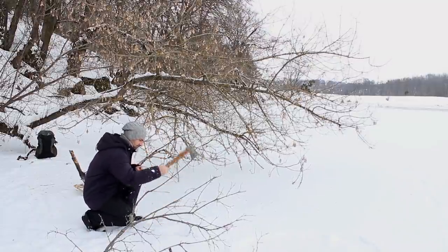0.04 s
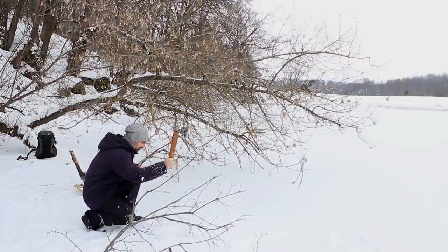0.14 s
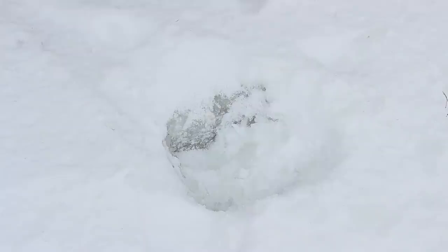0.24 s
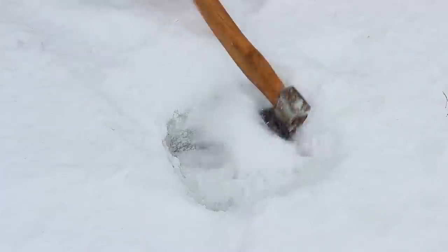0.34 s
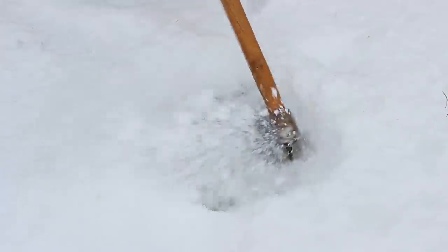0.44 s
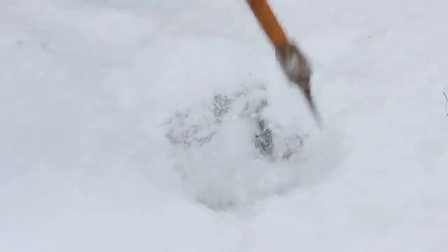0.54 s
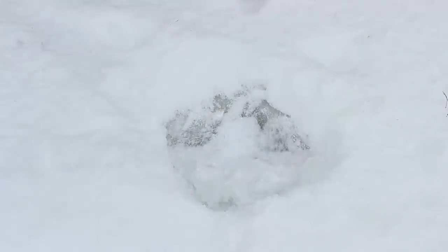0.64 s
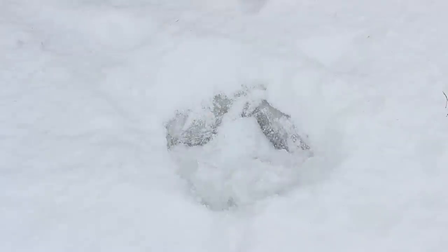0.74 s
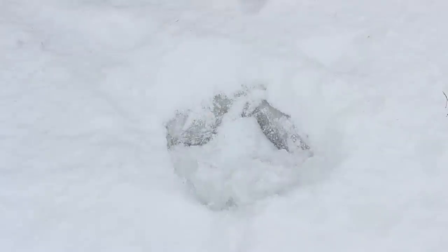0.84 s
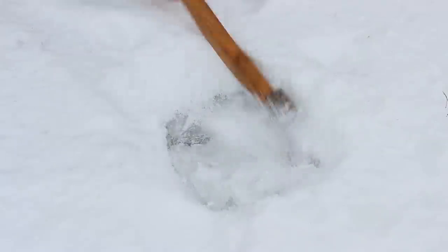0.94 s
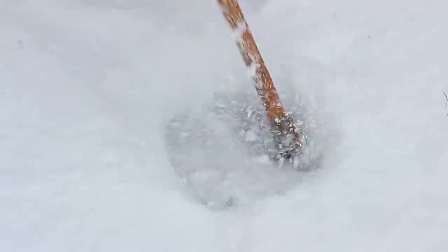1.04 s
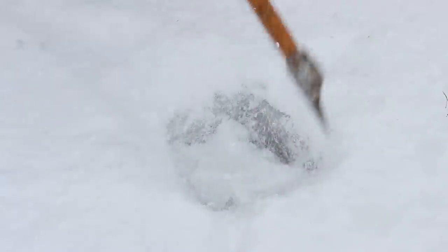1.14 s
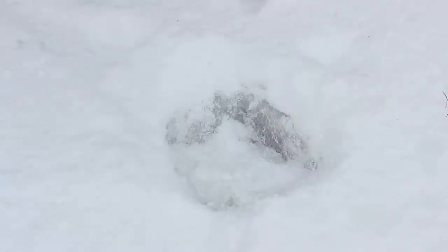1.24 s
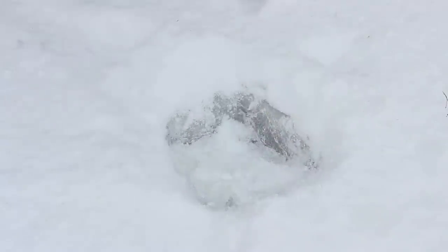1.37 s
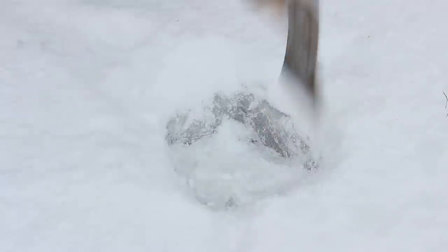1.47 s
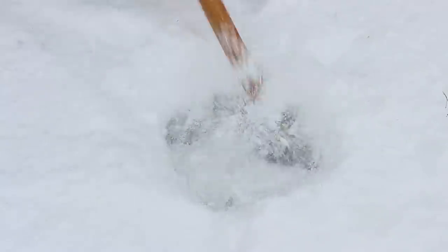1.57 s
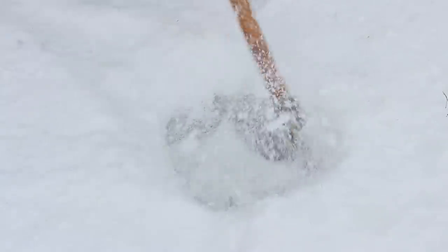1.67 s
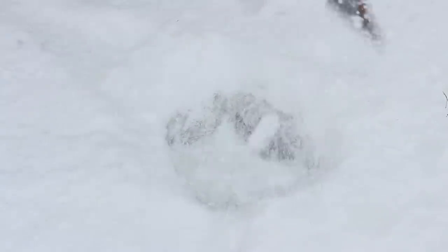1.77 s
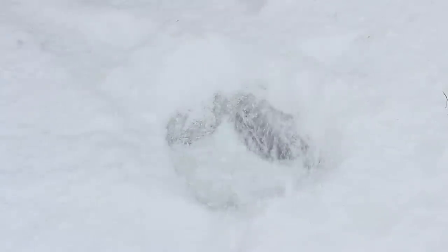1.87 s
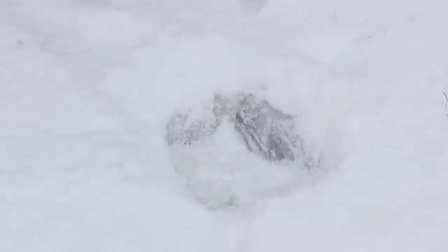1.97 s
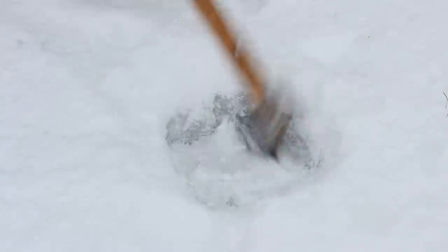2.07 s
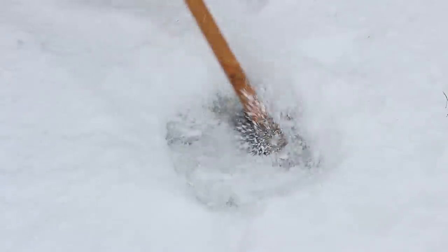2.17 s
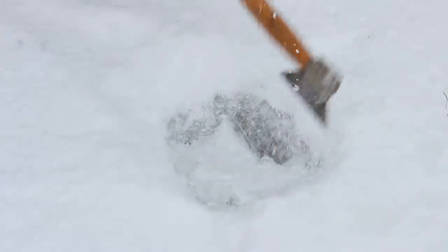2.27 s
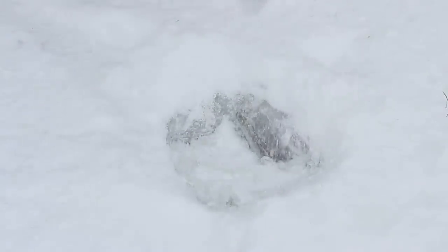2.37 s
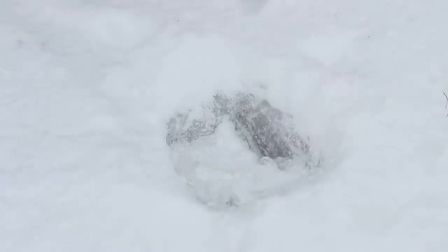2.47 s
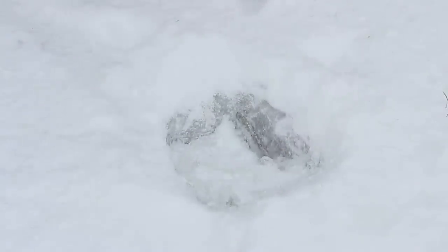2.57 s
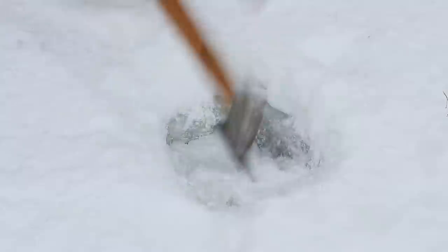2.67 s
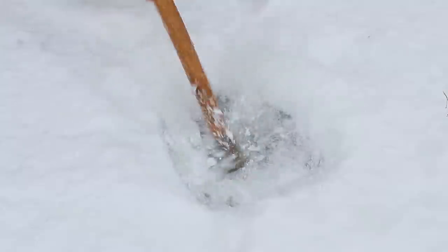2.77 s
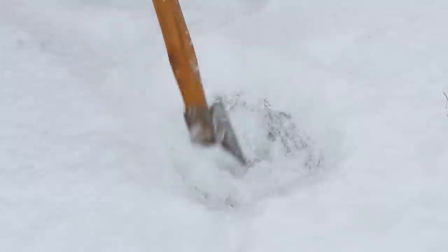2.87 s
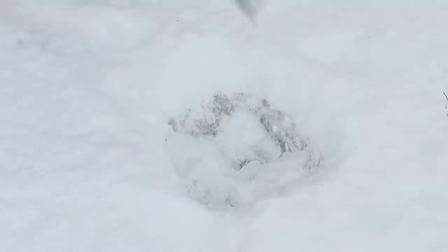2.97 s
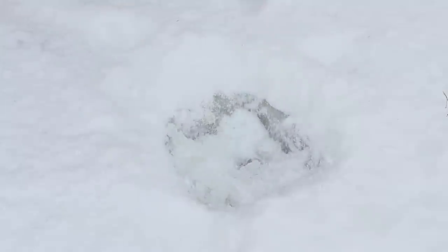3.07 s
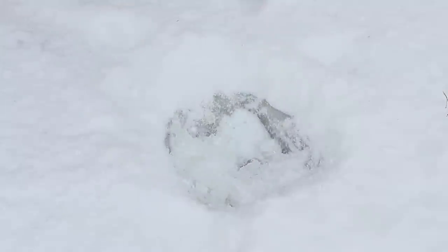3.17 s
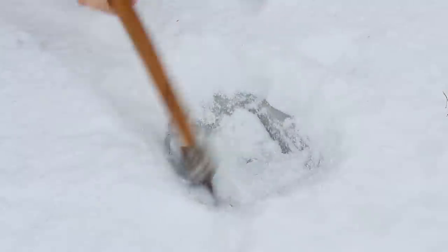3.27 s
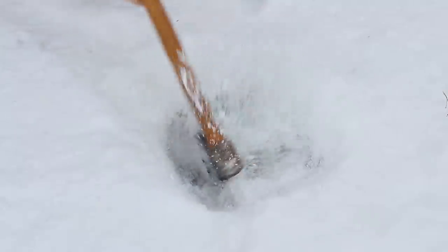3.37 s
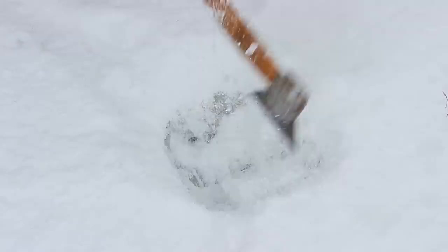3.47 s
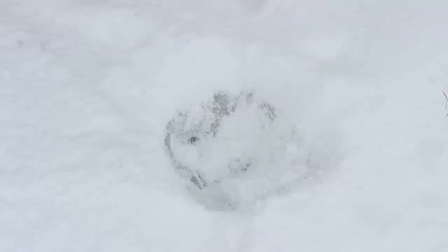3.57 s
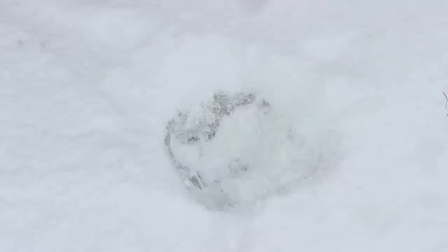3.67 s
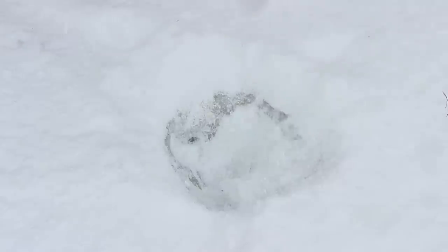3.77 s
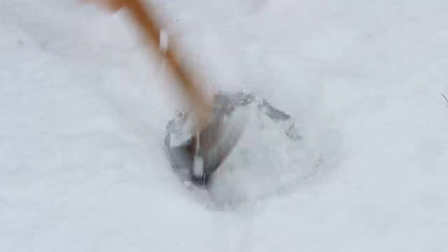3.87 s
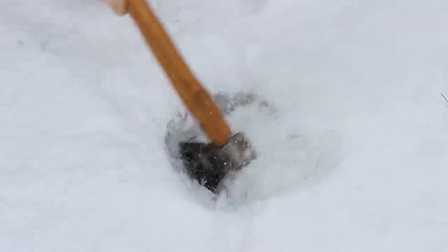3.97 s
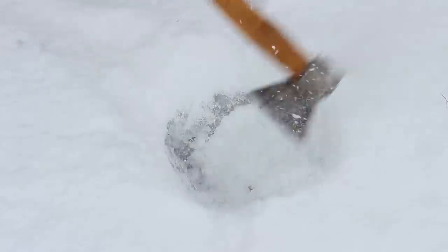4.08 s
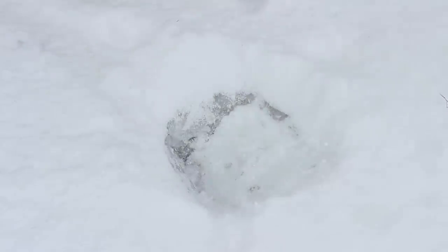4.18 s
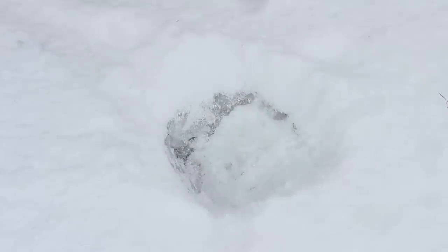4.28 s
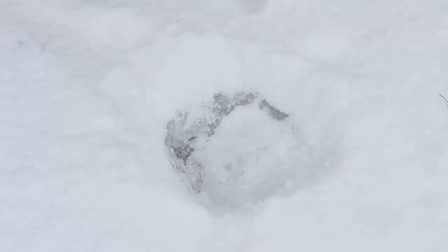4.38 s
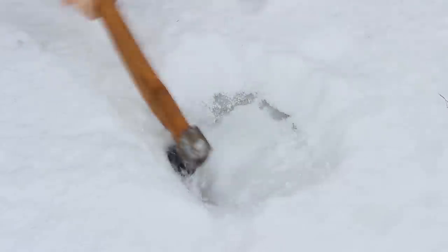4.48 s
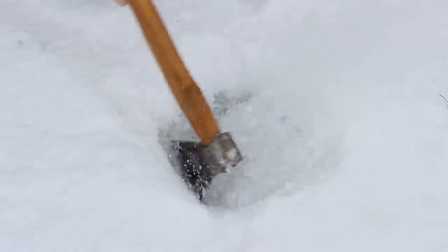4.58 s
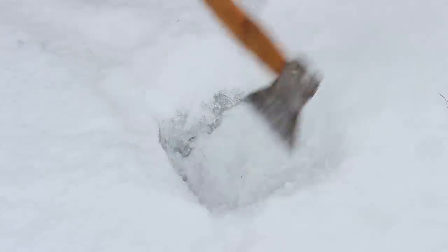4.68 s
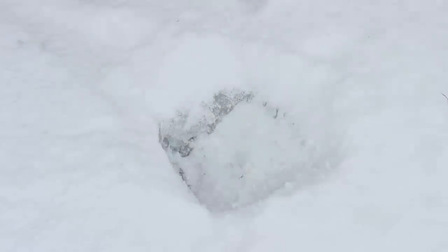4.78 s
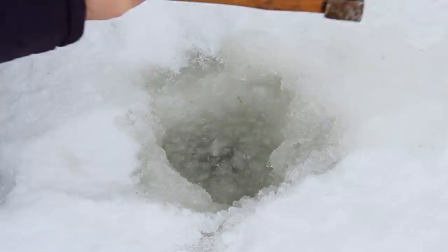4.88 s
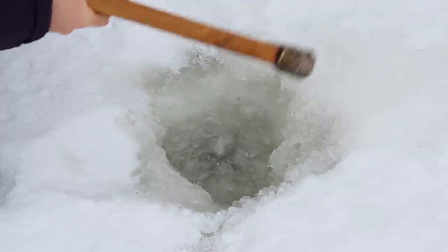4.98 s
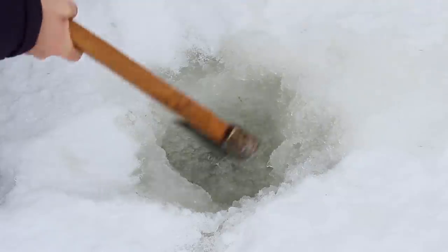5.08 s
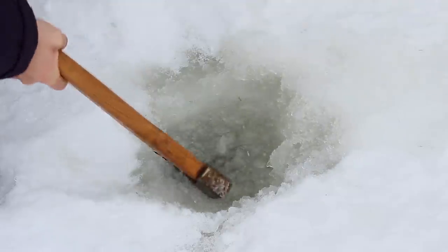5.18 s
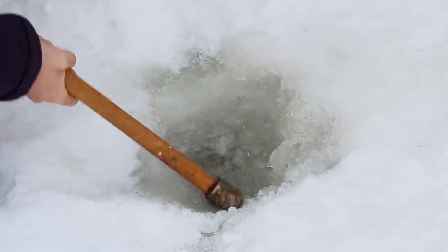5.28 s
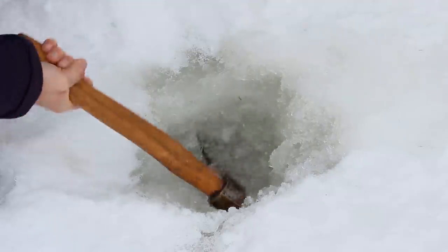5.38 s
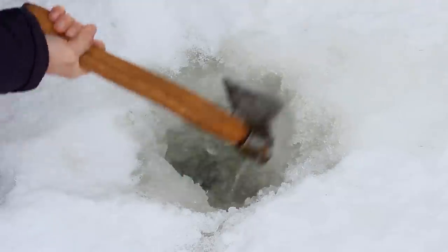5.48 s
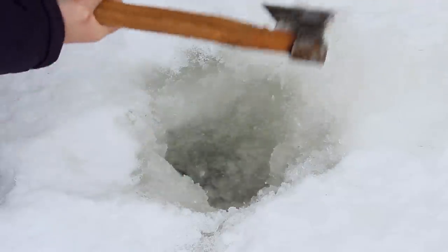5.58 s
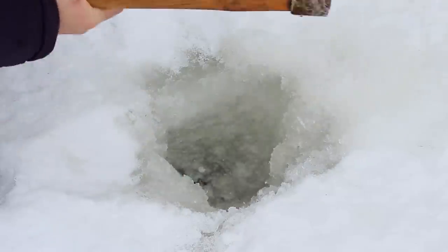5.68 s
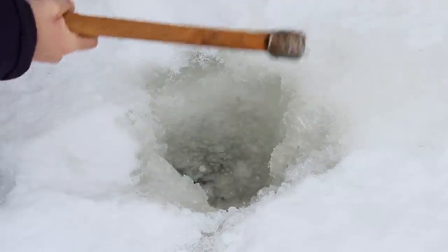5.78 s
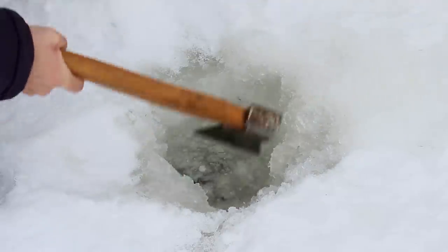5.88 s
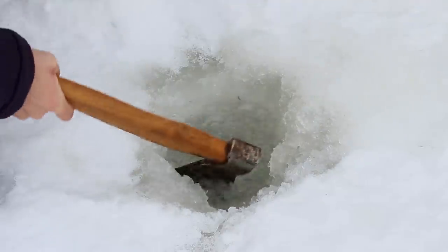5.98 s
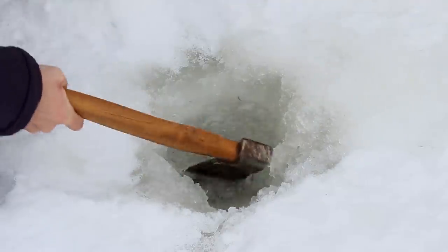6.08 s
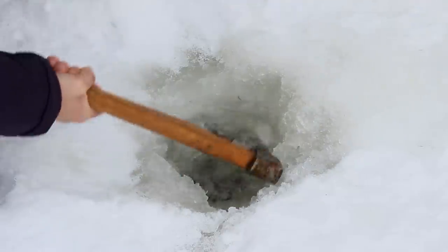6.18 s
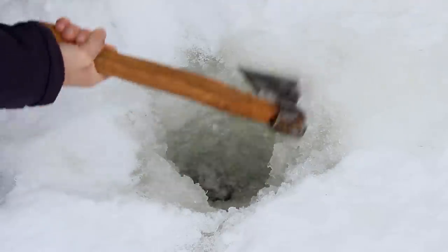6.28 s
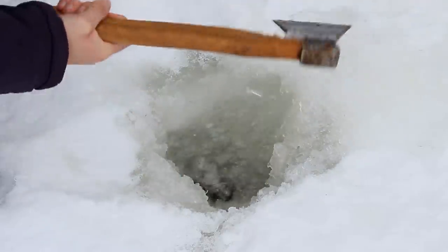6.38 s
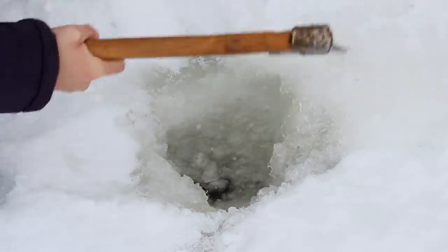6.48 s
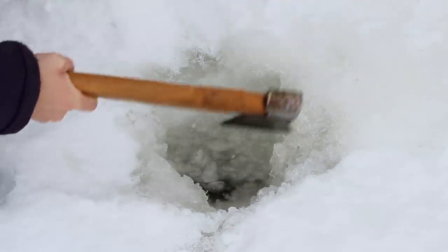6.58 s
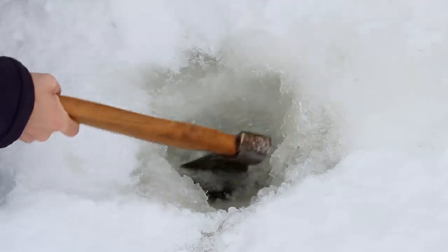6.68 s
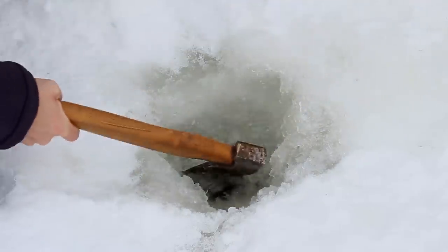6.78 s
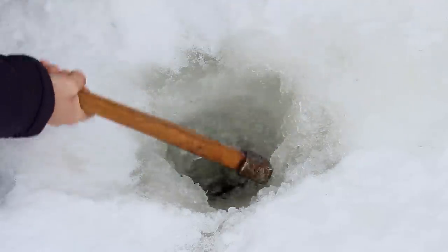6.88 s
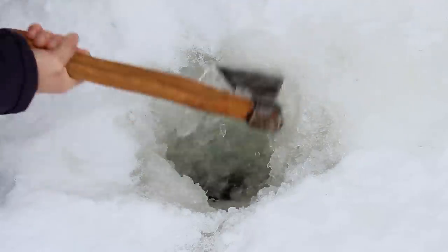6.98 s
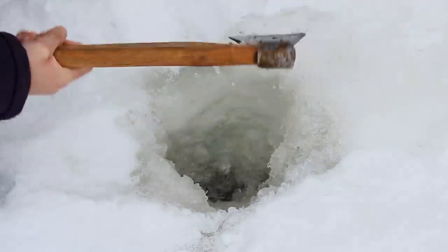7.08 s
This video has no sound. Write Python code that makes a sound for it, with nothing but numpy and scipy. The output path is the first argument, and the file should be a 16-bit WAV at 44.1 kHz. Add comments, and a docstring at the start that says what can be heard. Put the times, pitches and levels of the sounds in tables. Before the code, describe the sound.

A hatchet chops eight times into hard ice, ringing faintly between blows, then stirs wet, crunching, bubbling slush.

```python
"""A hatchet chops eight times into hard ice, then stirs wet slush in the hole, outdoors over snow.
Each chop is a short crushing burst that overloads the one close microphone; the steel head rings as it
is pulled free and chips patter down. In the slush grains crunch, bubbles pop and the wet steel rings
lower. Loose snow shifts throughout, over a faint low wind at the microphone."""
import sys
import numpy as np
from scipy import signal
from scipy.fft import rfft, irfft
from scipy.io import wavfile
from scipy.ndimage import uniform_filter1d

SR = 44100
rng = np.random.default_rng(int(sys.argv[2]) if len(sys.argv) > 2 else 0)


def wav_record(signal):
    """Record a signal, one row per channel, as 16-bit PCM in the file named by sys.argv[1]."""
    frames = np.transpose(np.atleast_2d(signal))
    bounded = np.clip(frames, -1, 1)
    # unit amplitude maps onto the largest positive 16-bit level
    quanta = np.round(bounded * 32767).astype(np.int16)
    wavfile.write(sys.argv[1], SR, quanta)


N = 314433

# spectrum of cracking ice: f/Hz, level/dB
CRACK_SPECTRUM = [(88, -88), (150, -27), (723, 10), (4690, 9), (5480, 11), (7660, -4.5), (11400, -1.5),
                  (15300, -9), (16500, -38)]
# resonances of the ice sheet and the handle: f/Hz, width/Hz, level/dB
SHEET_MODES = [(530, 93, 3), (1120, 130, -1), (2280, 390, 4), (2886, 460, 4)]
# blows, close to the microphone: t/s, crack/dB, wedging time/s, thud/dB, second split delay/s,
# second split/dB, thud t60/s, knock/Hz, knock/dB
CHOPS = [(0.4491, -13.5, 0.0056, -18, 0.0022, -44, 0.041, 480, -23),
         (1.042, -13.5, 0.016, -21.5, 0.0098, -12, 0.032, 2110, -21),
         (1.627, -9, 0.0077, -19.5, 0.0057, -7.5, 0.0065, 1036, -10),
         (2.209, -11.5, 0.013, -17, 0.0086, -14, 0.017, 1140, -14.5),
         (2.81, -10, 0.011, -21.5, 0.0059, -15.5, 0.026, 2700, -34),
         (3.404, -14.5, 0.014, -17.5, 0.0029, -19.5, 0.015, 510, -26.5),
         (4.008, -13.5, 0.012, -18, 0.0061, -15, 0.022, 1130, -15.5),
         (4.596, -9.5, 0.0064, -14, 0.0047, -23, 0.013, 660, -15.5)]
def chop(crack_db, wedge_s, thud_db, delay, split_db, t60, knock_hz, knock_db):
    """The edge cracks the ice twice; the sheet thuds and knocks as the blade wedges in, then all dies."""
    t = np.arange(4096) / SR
    crack_noise, sheet_noise, knock_noise = rng.standard_normal((3, len(t)))
    since_stop = np.maximum(t - wedge_s, 0)
    splits = amp(crack_db - 2150 * t) + amp(split_db - 2100 * (t - delay)) * (t > delay)
    crack = coloured(crack_noise, CRACK_SPECTRUM) * splits * amp(-60 * since_stop / (0.073 * t60))
    sheet = unit_rms(sum(amp(db) * resonate(sheet_noise, hz, width) for hz, width, db in SHEET_MODES))
    knock = amp(knock_db) * resonate(knock_noise, knock_hz, 240) * ramp((t - delay) / 0.0012)
    thud = (amp(thud_db) * sheet * ramp(0.3 + t / wedge_s) + knock) * amp(-60 * since_stop / t60)
    crumbs = amp(-53.5 - 60 * t) * coloured(crack_noise[::-1], CRUNCH_SPECTRUM)  # broken ice settles
    blow = (crack + thud + crumbs) * ramp(t / .0003)
    return highpass(blow, hz=230, order=3)  # the blow carries no deep bass


# blows that jam: t/s, peak/dB
JOLTS = [(1.0595, -22.5), (3.418, -22), (4.0142, -13.5)]
def jolt(db):
    """The blade jams to a stop in the ice: one short low push of pressure."""
    return -amp(db) * np.hanning(round(0.00087 * SR))


# modes of the steel head: f/Hz, relative level/dB, t60/s
STEEL_MODES = [(2080, 0, .9), (3914, 2, .2), (3973, 0, 1.8), (5520, 3, .18), (7130, -2, .18),
               (10800, -3, .1), (11400, -2, .25)]
# the head comes free: t/s, drive at 4 kHz/dB, at 5.5 kHz/dB, of the upper modes/dB, of the low mode/dB,
# time until damped/s, scrape/dB
STEEL_RINGS = [(.005, -53, -45.5, -51.5, -44, 0.3, -46), (0.538, -47, -44, -52, -34, 0.042, -44),
               (0.567, -56, -54, -45.5, -43.5, 0.3, -39), (1.148, -40, -52, -52, -47, 0.044, -44),
               (1.166, -45.5, -59, -51.5, -42.5, 0.38, -44), (1.731, -60, -55, -52, -55, 0.078, -40),
               (1.763, -46, -68, -54, -65, 0.35, -48), (2.3, -38, -49, -56, -51, 0.073, -28.5),
               (2.322, -43, -61, -47, -59, 0.34, -43.5), (2.912, -51, -65, -67, -48, 0.15, -40.5),
               (3.965, -64, -70, -44, -55, 0.053, -54), (4.123, -46, -51, -48, -55, 0.27, -43.5),
               (4.659, -69, -65, -65, -44, 0.17, -60)]
def steel_ring(pair_db, mid_db, high_db, low_db, length, scrape_db):
    """The steel scrapes free and rings until it is damped; grit shakes all but the 4 kHz pair of modes."""
    t = np.arange(round(length * SR)) / SR
    phases, grit = rng.random(len(STEEL_MODES)), rng.standard_normal((2, len(t)))
    shake = amp(5.2 * wander(grit[0], 250))
    low = amp(low_db - 1.5) * wander(grit[1], 120)
    # the longest mode is weak until the lifted head turns to the microphone
    facing_db = 4 - 6 * ramp((.45 - t / length) / .33)
    drives = [low, amp(pair_db), amp(pair_db + facing_db), amp(mid_db) * shake]
    drives += [amp(high_db) * shake] * 3
    modes = sum(drive * amp(db - 60 * t / t60) * np.sin(2 * np.pi * (hz * t + phase))
                for drive, (hz, db, t60), phase in zip(drives, STEEL_MODES, phases))
    scrape = amp(scrape_db - 730 * t) * shake * coloured(grit[1], CRUNCH_SPECTRUM)
    return (modes + scrape) * ramp(t / 0.00099) * ramp((length - t) / min(.08, length / 3))


# the loudest chips landing and slush snapping around the hole: t/s, peak/dB, f/Hz, treble/dB
ICE_SNAPS = [(0.013, -27, 2030, -49), (0.24, -31, 493, -25), (0.504, -28.5, 2370, -9),
             (0.702, -29, 5350, 7), (0.548, -16.5, 3160, -26), (0.72, -25, 4040, -10),
             (0.776, -20.5, 1500, -5), (0.783, -23, 1970, -8), (0.92, -29, 4500, -8),
             (1.113, -24.5, 540, -22), (1.116, -21, 2970, -22.5), (1.163, -16.5, 3770, -45),
             (1.453, -32, 6500, -11), (1.721, -26.5, 1030, -25), (1.986, -22, 6170, -2),
             (1.991, -25.5, 2070, -7), (2.033, -24, 2360, 3), (2.099, -12.5, 1630, -4),
             (2.151, -31.5, 4100, 10), (2.197, -27, 6000, 5), (2.25, -17, 1950, -1),
             (2.291, -18, 8550, -17), (2.297, -14.5, 3700, 5), (2.463, -29, 700, -21),
             (2.483, -33, 5500, -10), (2.651, -25, 1650, 9), (2.702, -26.5, 3790, 3),
             (2.883, -23.5, 1120, -22), (2.909, -23, 2850, -4), (3.482, -25, 1180, -20),
             (3.646, -27, 4580, -20), (3.747, -21.5, 2840, 9), (3.768, -23, 4100, -13),
             (4.16, -24, 1170, -18), (4.219, -30, 8000, -8), (4.232, -27.5, 8950, -15),
             (4.282, -32, 6000, -3), (4.392, -34, 3000, -14), (4.469, -29, 4100, 0),
             (4.972, -21.5, 3130, 2), (5.038, -20, 4340, -17), (5.09, -20.5, 3800, -8),
             (5.119, -19, 4960, -50), (5.166, -19, 3250, -12), (5.206, -11, 3060, -13),
             (5.22, -9, 3930, -8), (5.259, -14, 1600, -7), (5.274, -12, 2730, -35), (5.297, -13, 1100, -8),
             (5.404, -21, 1080, -9), (5.435, -19.5, 1550, -7), (5.456, -20, 690, -22),
             (5.537, -14.5, 2940, -64), (5.593, -14, 6200, -19), (5.63, -17, 4400, -21),
             (5.657, -23, 4500, -14), (5.669, -15, 4600, -20), (5.832, -28, 4360, -27),
             (5.925, -25.5, 4870, -30), (5.954, -21, 5730, -11), (5.986, -17, 2580, -6),
             (5.998, -17, 3200, -4), (6.005, -15, 2960, -22), (6.0418, -8, 1650, -7),
             (6.042, -16.5, 4200, -8), (6.081, -14, 3570, -31), (6.089, -11.5, 3670, -34),
             (6.11, -9.5, 1090, -13), (6.117, -6.5, 2610, -17), (6.121, -16, 3900, -14),
             (6.179, -16.5, 1060, -18), (6.394, -12, 1520, -18), (6.415, -13.5, 2100, -5),
             (6.42, -9, 3020, -20), (6.462, -19, 1580, -15), (6.533, -21, 815, -2)]
def ice_snap(db, hz, treble_db):
    """A grain of ice breaks: a sharp broad tick with some ring at its own pitch and a crumbling tail."""
    t = np.arange(2048) / SR
    break_noise, ring_noise = rng.standard_normal((2, len(t)))
    spectrum = [(250, -30), (0.49 * hz, -9), (hz, 0),
                (max(6000, 2.16 * hz), treble_db), (16800, treble_db - 16.5)]
    fade = amp(-9000 * t) + amp(-9 - 1900 * t) + amp(-29 - 600 * t)
    clink = .35 * resonate(ring_noise, hz, .15 * hz) * amp(-(1100 + .2 * hz) * t)
    tick = (coloured(break_noise, spectrum) * fade + clink) * ramp(t / 0.00028)
    tick = highpass(tick, hz=.4 * hz, order=2)  # no bass below its pitch
    return amp(db) * tick / abs(tick).max()


# dry splinters: t/s, peak/dB, f/Hz
SPLINTERS = [(0.7847, -13.5, 4300), (2.0995, -13.5, 5160), (3.9026, -7.5, 4800), (4.6847, -27, 5800),
             (4.721, -19, 11800), (5.1687, -15, 4600), (5.192, -26, 5700), (5.275, -3.5, 3660),
             (5.6205, -15, 4800), (5.8676, -18, 6100), (5.998, -14, 4500), (6.0313, -8, 6360),
             (6.11, -6, 1380), (6.6243, -19.5, 3600)]
def splinter(db, hz):
    """A splinter cracks in one sharp cycle of pressure, centred 40 samples in."""
    phase = np.arange(-40, 41) / SR * hz * 2 * np.pi
    return amp(db) * phase * np.exp(.5 - .5 * phase ** 2)


# chips that land flat: t/s, level/dB, f/Hz, t60/s
CHIP_KNOCKS = [(.7768, -26, 830, 0.03), (.7848, -29.5, 827, .06), (2.0327, -29.5, 2390, .035)]
def chip_knock(db, hz, t60):
    """A chip lands flat and rings hollow in one dying tone."""
    t = np.arange(round(t60 * SR)) / SR
    return amp(db - 60 * t / t60) * np.sin(2 * np.pi * hz * t)


def patter(crunch_gain):
    """Small chips tick and splinters click at random moments, following the level of the crunch."""
    out = np.zeros(N)
    for when, pitch, size, bright in rng.random((90, 4)):
        tick = ice_snap(db=11.5 - 8 * size, hz=4160 * 2 ** (1.6 * (pitch - .5)),
                        treble_db=-32 + 20 * bright)
        add(out, when * N / SR, tick * crunch_gain[int(when * N)])
    for when, pitch, size in rng.random((260, 3)):
        click = splinter(db=17 - 9 * size, hz=3000 * 4 ** pitch)
        add(out, when * N / SR, click * crunch_gain[int(when * N)])
    return out


# strokes through the slush in the hole: t/s, length/s, crunch/dB, hiss/dB, rustle/dB, gurgle/dB,
# bubbles from f/Hz, to f/Hz, share of the stroke after which the hiss fades
SLUSH_STROKES = [(5.145, 0.17, -40.5, -31.5, -47, -33.5, 4070, 1480, 0.45),
                 (5.374, 0.17, -41, -65, -44, -39.5, 1114, 1800, .3),
                 (5.553, 0.15, -36.5, -38.5, -48, -41, 2060, 3170, 0.48),
                 (5.934, 0.18, -35, -35, -51, -43, 3930, 1430, 0.52),
                 (6.141, 0.14, -45, -51, -65, -39, 910, 1790, .9),
                 (6.266, 0.17, -36, -32, -41, -33.5, 1517, 2380, 0.96),
                 (6.443, 0.13, -50, -46, -44.5, -59, 1510, 2300, 0.9)]
def slush_strokes(gains):
    """The blade stirs the slush: each stroke adds its power to the gains of crunch, hiss and rustle."""
    t = np.arange(N) / SR
    for start, length, crunch_db, hiss_db, rustle_db, *_, share in SLUSH_STROKES:
        past_crest = ramp((t - start) / length) - share
        hiss_db = hiss_db + 12.5 * np.minimum(past_crest, 0) - 14 * np.maximum(past_crest, 0)
        shape_db = stroke_db(t, start, length)
        gains = np.hypot(gains, amp([crunch_db + shape_db, hiss_db + shape_db, rustle_db + shape_db]))
    return gains


def stroke_db(t, start, length, build_db=4.5, edge_s=0.014):
    """Level of a stroke under its top: quick start, steady build, quick stop."""
    onset = np.clip((t - start) / edge_s, 1e-4, 1)
    stop = np.clip((start + length + edge_s - t) / edge_s, 1e-4, 1)
    return build_db * (ramp((t - start) / length) - 1) + 20 * np.log10(onset * stop)


def gurgle():
    """Small bubbles pop in the slush: short rising tones about a pitch that glides through each stroke."""
    out = np.zeros(N)
    for start, length, *_, gurgle_db, from_hz, to_hz, _share in SLUSH_STROKES:
        for when, pitch, size, life in rng.random((110, 4)):
            at = start + when * length
            hz = from_hz * (to_hz / from_hz) ** when * 2 ** (1.8 * (pitch - .4))
            age = np.linspace(0, 1, round(SR * (6 + 24 * life ** 2) / hz))
            cycles = np.cumsum(hz * (1 + 0.201 * age)) / SR  # pitch rises as it nears the surface
            db = gurgle_db + stroke_db(at, start, length) - 4 * np.log(size + 0.11) - 14 * age
            add(out, at, amp(db) * np.sin(2 * np.pi * cycles) * ramp(age / 0.27))
    return out


# single bubbles and wet steel in the hole: t/s, level/dB, start f/Hz, end f/Hz, length/s
WET_TONES = [(5.011, -22.5, 1430, 1560, 0.005), (5.215, -19, 3960, 3730, 0.051),
             (5.277, -25.5, 2830, 2450, 0.037), (5.23, -20.5, 2680, 2640, 0.015),
             (5.232, -25, 5330, 5370, 0.018), (5.324, -14.5, 1340, 1450, 0.007),
             (5.429, -29, 1530, 1720, 0.012), (5.466, -31, 1400, 1480, .014),
             (5.475, -23, 1990, 2140, 0.012), (5.627, -29, 1550, 1700, 0.012),
             (5.662, -30, 1340, 1450, 0.01), (6.105, -20.5, 1036, 1125, 0.022),
             (5.476, -34, 1040, 930, 0.036), (5.537, -21, 3280, 3280, 0.017),
             (5.568, -31, 3400, 3580, .036), (5.54, -29, 2490, 2540, 0.029),
             (5.566, -31.5, 508, 560, 0.037), (5.265, -26, 1480, 1500, 0.011),
             (6.175, -27, 1040, 1060, 0.028), (6.268, -25.5, 3380, 3200, 0.068),
             (6.281, -26, 3290, 3220, 0.014), (6.347, -28.5, 3430, 3730, 0.065),
             (6.392, -25.5, 544, 610, 0.013)]
def wet_tone(db, start_hz, end_hz, length):
    """A bubble or the wet steel sounds a gliding tone, roughened by the slush around it."""
    age = np.linspace(0, 1, round(length * SR))
    level_noise, pitch_noise = rng.standard_normal((2, len(age)))
    waver_db = 3 * wander(level_noise, 110, 110)
    wobble = 1 + .007 * wander(pitch_noise, 120)
    cycles = np.cumsum((start_hz + (end_hz - start_hz) * age) * wobble) / SR
    envelope = amp(db - 11.6 * age + waver_db) * signal.windows.tukey(len(age), .3)
    return envelope * np.sin(2 * np.pi * cycles)


# modes of the head under slush: f/Hz, relative level/dB
WET_STEEL_MODES = [(1040, -3.5), (1800, -2), (2500, -5), (3300, -2)]
# the head leaves the slush: t/s, length/s, level/dB, pitch factor from, to
HEAD_LIFTS = [(5.46, .16, -45.5, 0.96, 1.05), (6.166, 0.28, -43, 0.97, 1.05)]
def head_lift(length, db, low, high):
    """Slush brushes the head as it is lifted out: its modes sound fuzzily and rise as the water lets go."""
    age = np.linspace(0, 1, round(length * SR))
    rise = low + (high - low) * age ** 2
    out = np.zeros(len(age))
    for hz, mode_db in WET_STEEL_MODES:
        real, imaginary, swell = rng.standard_normal((3, len(age)))
        fuzz = wander(real, 200, 200) + 1j * wander(imaginary, 200, 200)
        fuzz *= amp(5.9 * wander(swell, 200, 200, 900))  # comes and goes
        out += amp(mode_db) * (fuzz * np.exp(2j * np.pi * np.cumsum(hz * rise) / SR)).real
    return amp(db) * out * signal.windows.tukey(len(age), .3)


# steady shifting of loose snow, later of slush, close by: t/s, crunch/dB, hiss/dB, rustle/dB
SNOW_LEVELS = [(0, -47.5, -55, -62.5), (0.25, -50.5, -54, -53.5), (0.36, -53, -60, -65),
               (0.8, -46.5, -43.5, -58.5), (1.019, -47, -49.5, -60.5), (1.2, -52.5, -61.5, -63.5),
               (1.5, -53, -56, -66.5), (1.68, -54, -56, -62.5), (1.76, -53, -59.5, -65),
               (2.05, -55.5, -56, -67), (2.4, -48, -52.5, -59), (2.7, -50, -50.5, -63),
               (3.1, -49, -52, -61.5), (3.55, -50.5, -47.5, -62.5), (3.8, -44.5, -41, -52),
               (4.06, -53, -56.5, -67.5), (4.18, -51.5, -52, -65), (4.4, -53.5, -53, -66),
               (4.945, -51.5, -48, -64), (4.975, -41, -42, -51), (5.14, -45.5, -39.5, -50),
               (5.42, -40, -47, -52), (5.78, -40.5, -41, -53), (6.0, -52, -44.5, -51),
               (6.18, -39.5, -52, -44.5), (6.52, -37, -40.5, -55), (6.64, -45, -46, -42.5)]
def snow_gains():
    """Gains of crunch, hiss and rustle: the snow shifts steadily and swells with each downswing."""
    t = np.arange(N) / SR
    times, *steady = np.transpose(SNOW_LEVELS)
    db = np.array([np.interp(t, times, column) for column in steady])
    swing_db, swing_s = (3.5, 5, 15.5), 0.12
    # after the blow, crunch and rustle die back while the hiss drops and returns
    after_db, after_s = np.c_[[8.5, -3, 13]], np.c_[[0.12, 0.66, 0.18]]
    for blow, *_ in CHOPS:
        since = t - blow
        db += np.outer(swing_db, np.exp(np.minimum(since, 0) / swing_s) * (since < 0))
        db += after_db * np.exp(-np.maximum(since, 0) / after_s) * (since >= 0)
    return amp(db)


# spectra of the grains' crunch, fine hiss and low rustle: f/Hz, level/dB
CRUNCH_SPECTRUM = [(700, -14), (1200, -2.5), (2200, -1), (4000, -2), (5000, -7), (7000, -18.5)]
HISS_SPECTRUM = [(3500, -15), (6000, -10), (9000, -11.5), (13000, -10), (15500, -12.5), (15900, -20)]
RUSTLE_SPECTRUM = [(120, -10), (250, -1), (500, 3.5), (1000, -0.5), (1600, -14)]
def shifting_snow(crunch_gain, hiss_gain, rustle_gain):
    """Snow dust and slush shift all the time: crunch, hiss and rustle come from the same grains."""
    fine = grains(per_s=300, spread_db=4, smooth=1.2)
    coarse = grains(per_s=350, spread_db=4, smooth=1.74)
    crunch = coloured(0.44 * fine + coarse, CRUNCH_SPECTRUM) * crunch_gain
    hiss = coloured(fine, HISS_SPECTRUM) * hiss_gain
    rustle = coloured(fine + 0.23 * coarse, RUSTLE_SPECTRUM) * rustle_gain
    return crunch + hiss + rustle


def grains(per_s, spread_db, smooth):
    """Many small breaks of uneven size over a share of smooth noise, swelling in bunches."""
    breaks = amp(spread_db * np.minimum(rng.exponential(1, N), 3.2)) * (rng.random(N) < per_s / SR)
    puffs = signal.oaconvolve(breaks, amp(-np.arange(400) * 0.26))[:N]
    bunch_db = 2.17 * wander(rng.standard_normal(N), 500, 500)
    return rng.standard_normal(N) * (smooth + unit_rms(puffs)) * amp(bunch_db)


# spectrum of the wind at the microphone: f/Hz, level/dB
WIND_SPECTRUM = [(12, -12), (20, 0.5), (27, -39), (54, -1.5), (242, -12.5), (400, -16.5), (520, -5),
                 (880, -120)]
# its strength: t/s, level/dB
WIND_LEVELS = [(0, -63.5), (2.8, -61.5), (3.9, -63), (5, -59.5), (6.6, -52)]
def wind():
    """Open air rumbles faintly at the microphone."""
    db = np.interp(np.arange(N) / SR, *np.transpose(WIND_LEVELS))
    return amp(db) * coloured(rng.standard_normal(N), WIND_SPECTRUM)


def amp(db):
    """Decibels to gain."""
    return 10 ** (np.asarray(db) / 20)


def ramp(x):
    """Holds x between 0 and 1."""
    return np.clip(x, 0, 1)


def unit_rms(x):
    """Scales to rms 1."""
    return x / np.sqrt(np.mean(x ** 2) + 1e-20)


def wander(noise, *widths):
    """Noise slowed by moving averages of these widths in samples, rms 1."""
    for width in widths:
        noise = uniform_filter1d(noise, width)
    return unit_rms(noise)


def coloured(x, points):
    """Filters x by a table of (f/Hz, level/dB), rms 1."""
    hz, db = np.transpose(points)
    bins = np.fft.rfftfreq(len(x), 1 / SR)
    curve_db = np.interp(np.log(bins + 1), np.log(hz + 1), db, -90, -90)
    return unit_rms(irfft(rfft(x) * amp(curve_db), len(x)))


def resonate(x, hz, width):
    """A two-pole resonance, rms 1."""
    r = np.exp(-np.pi * width / SR)
    return unit_rms(signal.lfilter([1, 0, -1], [1, -2 * r * np.cos(2 * np.pi * hz / SR), r * r], x))


def highpass(x, hz, order):
    """Cuts the bass below hz."""
    return signal.sosfilt(signal.butter(order, hz, 'high', fs=SR, output='sos'), x)


def add(mix, at, sound):
    """Mixes a sound in at a time in seconds."""
    part = mix[max(round(at * SR), 0):][:len(sound)]
    part += sound[:len(part)]


def scene():
    """The hatchet, the hole and the snow around it, all close to one microphone."""
    crunch, hiss, rustle = slush_strokes(snow_gains())
    mix = shifting_snow(crunch, hiss, rustle) + patter(crunch) + gurgle() + wind()
    for play, rows in ((chop, CHOPS), (jolt, JOLTS), (steel_ring, STEEL_RINGS), (ice_snap, ICE_SNAPS),
                       (chip_knock, CHIP_KNOCKS), (wet_tone, WET_TONES), (head_lift, HEAD_LIFTS)):
        for at, *row in rows:
            add(mix, at, play(*row))
    for at, db, hz in SPLINTERS:
        add(mix, at - 40 / SR, splinter(db, hz))
    return mix[None]


def record(dry):
    """Gain control ducks what follows a loud sound and overload flattens the chops; one stir repeats."""
    power = uniform_filter1d(np.clip(dry[0], -.27, .27) ** 2, 441)
    power_db = 10 * np.log10(abs(power) + 1e-12)
    release_db = np.arange(N) * 30.1 / SR
    held_db = np.maximum.accumulate(power_db + release_db) - release_db
    threshold_db, lag, ceiling = -40.5, round(.022 * SR), .28
    over_db = np.maximum(held_db - threshold_db, 0)
    duck_db = 0.38 * uniform_filter1d(np.pad(over_db, (lag, 0))[:N], 300)  # the control answers late
    drive = dry / amp(duck_db) / ceiling
    overloaded = ceiling * np.tanh(drive * np.sqrt(1 + drive ** 2))
    # the first half second of stirring sounds again at the end
    stir, again = round(5.07 * SR), round(6.63823 * SR)
    repeated = np.concatenate([overloaded[:, :again], overloaded[:, stir:stir + N - again]], axis=1)
    band_limit = signal.firwin(511, cutoff=16750, window=("kaiser", 9), fs=SR)
    return signal.oaconvolve(repeated, band_limit[None], "same")


dry = scene()
out = record(dry)
wav_record(out)
```